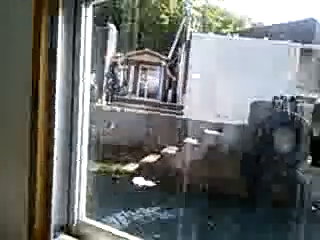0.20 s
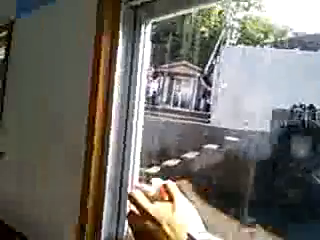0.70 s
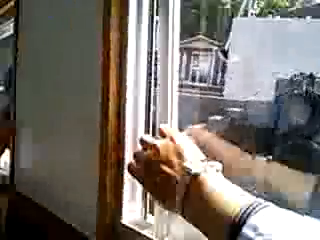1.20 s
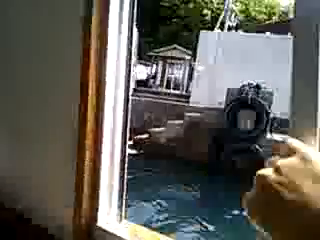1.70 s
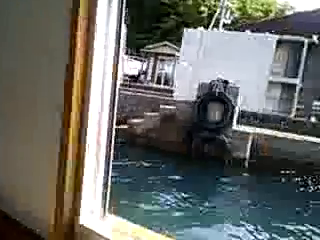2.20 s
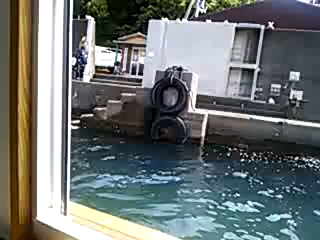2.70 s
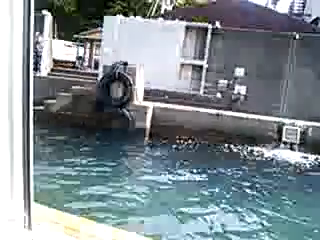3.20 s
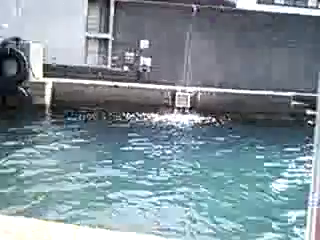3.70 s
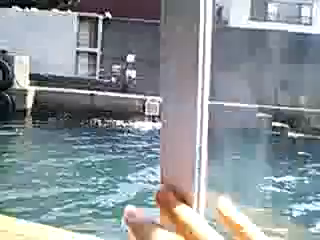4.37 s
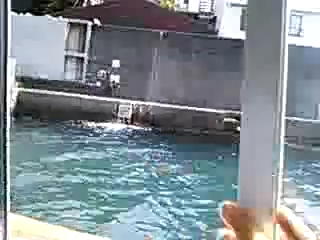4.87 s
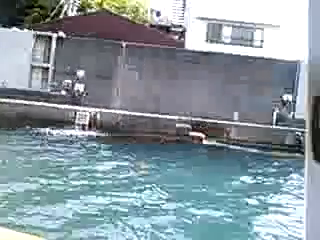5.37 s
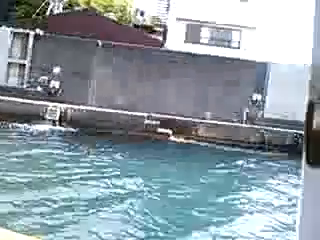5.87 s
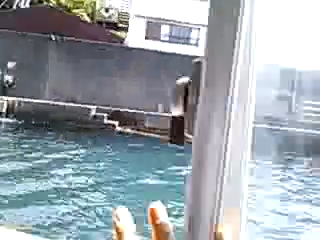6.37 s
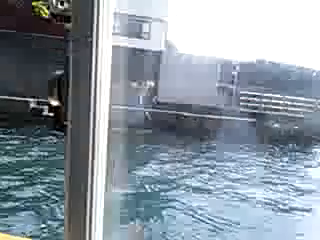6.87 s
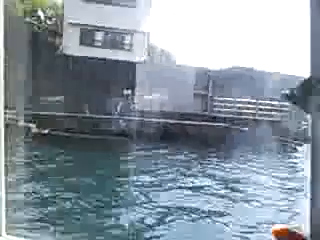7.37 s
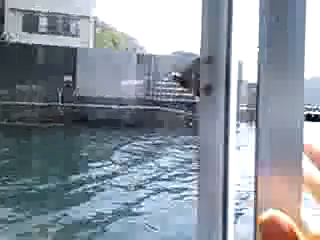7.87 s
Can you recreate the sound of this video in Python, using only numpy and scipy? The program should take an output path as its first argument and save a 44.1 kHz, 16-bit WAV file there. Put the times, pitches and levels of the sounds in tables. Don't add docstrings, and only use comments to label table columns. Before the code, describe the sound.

A slow diesel under the floor booms steadily through a boat cabin, with even clatter, faint gear whine and a soft hiss of air and water. Close to the microphone, a sliding window bumps and its glass rattles, then knocks on the frame a few times. Near the end it sticks and slips along its rail and thuds shut with a short metallic latch ring. The sound is dull and narrow, like a handheld phone.

```python
import sys
import numpy as np
from scipy import signal
from scipy.fft import rfft, irfft, next_fast_len
from scipy.io import wavfile
from scipy.ndimage import uniform_filter1d

SR = 44100
rng = np.random.default_rng(int(sys.argv[2]) if len(sys.argv) > 2 else 0)


def rack_gain(trim_db):
    fader = np.asarray(trim_db, float)
    return 10 ** (fader / 20)


def inscribe(sig):
    pcm = np.round(np.clip(np.atleast_2d(sig).T, -1, 1) * 32767)
    wavfile.write(sys.argv[1], SR, pcm.astype(np.int16))


N = 359415
T = np.arange(N) / SR
SIZE = next_fast_len(N)
CYLINDERS = 6

# start_s, firing_hz
FIRING_RATE = [(0, 54.75), (.8, 55.1), (1.8, 55.35), (2.4, 55.4), (3.3, 55.72), (4.3, 55.69), (5.3, 55.5),
               (6.3, 55.53), (6.8, 55.8), (8.15, 55.75)]
# start_s, firing_db, second_multiple_db
BOOM_PATH = [(0.0, -31, -32.5), (0.2, -37.5, -37.5), (0.6, -29.5, -33), (1.84, -29, -33.5),
             (2.25, -30, -27.5), (2.43, -29, -32.5), (3.08, -29, -33.5), (3.26, -25, -33.5),
             (3.55, -28, -35), (4.58, -26.5, -33), (5.2, -26, -38), (5.8, -30, -35.5), (5.95, -26.5, -36.5),
             (6.6, -32, -34), (6.9, -28.5, -35), (7.2, -33.5, -40), (7.58, -34, -32.5),
             (7.95, -26.5, -34.5)]
# start_s, level_db
THIRD_PATH = [(0.0, -39), (0.25, -37), (0.29, -41), (2.84, -44.5), (4.42, -37.5), (4.67, -45),
              (5.95, -44.5), (6.24, -54), (6.38, -42.5), (6.81, -43.5), (6.88, -56), (6.99, -43),
              (8.13, -39), (8.15, -44.5)]
SHAFT_MULTIPLES = [2, 3, 4, 7, 8, 9, 13, 16, 23, 24, 28, 30, 46, 48, 50, 54, 56, 58, 60, 63, 72, 84, 96,
                   137, 153]
SHAFT_DB = [-46, -49, -48, -54, -52, -47, -53, -44, -46, -52, -54, -54, -59, -53, -56, -59, -59, -60, -58,
            -61, -59, -61, -62, -60, -62]
# pitch_hz, width_hz, level_db
GEAR_WHINE = [(1028, 36, -56), (913, 39, -55), (1411, 25, -56.5)]
# pitch_hz, level_db
RUMBLE_COLOUR = [(12, -22), (22, -5), (43, -15), (64, -6), (200, -10), (260, -13.5), (320, -17), (369, -15),
                 (604, -21), (676, -20.5), (900, -30.5), (1170, -68), (1980, -120)]
CLATTER_COLOUR = [(300, -25.5), (600, -9), (680, -4), (760, -8.5), (900, -1.5), (960, -5.5), (1030, -2),
                  (1150, -2), (1320, -3), (1430, -6.5), (1800, -16.5), (2600, -36.5)]
HISS_COLOUR = [(1100, -30.5), (1500, -2), (1700, -2), (2200, -5), (2750, -4), (3150, -10.5), (5000, -12),
               (6700, -10), (6950, -16), (7900, -21), (8300, -25.5)]
# start_s, clatter_db
HATCH_PATH = [(0, -43), (2.0, -42), (2.56, -43.5), (3.05, -42.5), (3.9, -44), (5.1, -43.5), (7.0, -43),
              (7.7, -44), (8.15, -43)]
# place in cycle 0-1, level_db
PLATE_KNOCKS = [(.1, -3), (.2626, -5), (.4333, 0)]
LATE_HATCH_KNOCKS = [(.04, -5), (.79, 0)]
EARLY_HATCH_KNOCKS = [(.19, 0), (.32, -4), (.94, -5)]
BOARD_KNOCKS = [(.21, -1), (.71, 0)]
# multiple of the cycle, level_db, from_s, until_s
SINGING_PANELS = [(34, -50.5, 1.2, 9), (36, -49.5, .9, 5.6), (36, -51, 6.2, 9), (126, -52.5, 2.5, 4.4),
                  (74, -57, 2.4, 5.2), (23, -48, .7, 2.3), (18, -44, .8, 2.4), (18, -45, 3.5, 4.5),
                  (18, -45, 5.1, 7), (47, -51, -1, .7), (123, -55, -1, 2.4), (111, -54, 1.1, 2.3)]
# start_s, level_db, pitch_hz, t60_s
SASH_BUMPS = [(0.031, -22, 209, 0.17), (.19, -25.5, 169, 0.3), (1.497, -31.5, 663, 0.085),
              (3.285, -26.5, 201.3, 0.25), (3.287, -25, 450, 0.04), (1.23, -26.5, 209, 0.25),
              (7.261, -17, 111, 0.035), (7.265, -26, 300, 0.042), (7.274, -20, 450, 0.027),
              (7.291, -18, 197, 0.037), (7.317, -13.5, 120, 0.042), (7.329, -9.5, 112, 0.03),
              (7.335, -22, 317, 0.044), (7.3436, -19.5, 400, .012), (7.3458, -9, 400, 0.0094),
              (7.353, -11.5, 90, 0.058), (7.381, -12, 120, 0.014), (7.4157, -19, 130, 0.046),
              (7.4245, -20, 180, .04), (7.435, -15, 89, 0.036), (7.445, -19, 85, 0.033),
              (3.2965, -26.5, 520, 0.036), (3.307, -19, 150, .06)]
# start_s, level_db
PANE_RATTLES = [(0.134, -46.5), (0.26, -43.5), (0.272, -37.5), (0.289, -39), (0.44, -50), (0.553, -38),
                (0.569, -46), (0.766, -60), (1.0225, -42), (3.402, -50), (4.3765, -43.5), (4.753, -40.5),
                (4.8595, -54.5)]
# start_s, level_db, pitch_hz, t60_s
FELT_SCUFFS = [(1.49, -37, 800, 0.05), (1.492, -40, 5460, 0.087), (3.268, -42.5, 5000, 0.11),
               (3.285, -34, 703, .07), (2.606, -47, 5980, .04), (1.784, -45, 2410, 0.24),
               (1.799, -50, 6500, .05), (4.64, -49, 5100, 0.2), (6.565, -47, 3170, .11),
               (7.09, -45.5, 5070, 0.2), (7.261, -30, 450, 0.068), (7.286, -32, 407, 0.04),
               (7.309, -30.5, 302, 0.086), (7.329, -35.5, 540, 0.051), (7.344, -36.5, 690, 0.035),
               (7.405, -29, 496, 0.05), (7.406, -30.5, 2260, 0.039), (7.416, -44, 2900, 0.088),
               (.403, -52, 6360, .08), (0.609, -52.5, 6370, .1), (7.43, -50, 4100, 0.044),
               (7.432, -29.5, 246, 0.047), (8.104, -43.5, 4630, 0.07), (.22, -38.5, 260, .25),
               (.4, -39, 200, .2), (4.3, -40, 250, .28), (4.55, -37.5, 330, .28), (6.88, -36, 120, .2),
               (7.3, -32.5, 220, .28), (7.407, -37.5, 3000, .05)]
# start_s, level_db,
# pitch_hz, swell_s
RAIL_RINGS = [(1.497, -41.5, 4157, 0.007), (1.495, -36, 1430, 0.009), (1.53, -53, 4350, .013),
              (1.772, -50, 4800, .012), (1.79, -48, 4800, .011), (1.8, -50, 4600, .013),
              (1.813, -48, 4720, .011), (3.0, -56, 4100, .012), (3.277, -46, 6750, .004),
              (3.291, -29, 3220, 0.002), (3.298, -42, 3260, 0.0016), (2.608, -42, 3350, 0.0017),
              (2.609, -39, 1400, .002), (2.624, -43, 1900, .003), (1.497, -44, 5500, .006),
              (3.305, -37.5, 1156, .012), (6.481, -47.5, 4700, .002), (6.527, -42, 4530, .002),
              (6.536, -50, 5030, 0.0026), (6.5506, -40, 4870, 0.0023), (6.567, -38, 1720, .0036),
              (6.572, -43, 3200, 0.0016), (6.58, -43, 4300, .002), (6.587, -42, 3150, 0.0015),
              (6.595, -48, 2420, .0023), (6.971, -36, 5950, 0.0028), (6.995, -51, 5060, .0027),
              (7.107, -47, 6160, .002), (7.18, -50, 4970, .009), (7.243, -45, 6650, 0.0054),
              (7.304, -45, 6400, .004), (7.396, -47, 3700, 0.0026), (7.4061, -21.5, 1904, 0.004)]
# start_s, snap_db, snap_hz, body_db, noise_db
FRAME_KNOCKS = [
    (1.499, -53, 5600, -39.5, -43.5),
    (2.607, -38.5, 3080, -36.5, -48.5),
    (3.2905, -30.5, 5970, -33, -35.5),
    (6.5513, -46, 3300, -50, -44.5),
    (6.972, -48, 5030, -46, -45),
    (7.406, -33, 6030, -40.5, -32.5),
]
# pitch_hz, level_db, t60_s
LATCH_MODES = [(1560, -10, .03), (2250, -9, .02), (2900, -8, .02), (5087, 2.5, .016)]
# pitch_hz, level_db
FRAME_COLOUR = [(20, 0), (6800, 0), (7000, -2), (9000, -3)]


def level(x, db):
    return x * rack_gain(db) / np.sqrt(np.mean(x ** 2))


def gain_at(hz, points):
    f, db = np.transpose(points)
    return rack_gain(np.interp(np.log(hz + 1), np.log(f), db, left=-70, right=-70))


def colour(x, points):
    hz = np.arange(SIZE // 2 + 1) * SR / SIZE
    return irfft(rfft(x, SIZE) * gain_at(hz, points), SIZE)[:N]


def band(x, hz, width):
    return signal.lfilter(*signal.iirpeak(min(hz, .45 * SR), hz / width, fs=SR), x)


def walk(rate):
    k = int(SR / rate)
    steps = np.repeat(rng.standard_normal(N // k + 1), k)
    return 1.17 * uniform_filter1d(uniform_filter1d(steps, k), k)[:N]


def hold(times):
    return np.interp(T, times, [0, 1, 1, 0])


def follow(points):
    return np.interp(T, *np.transpose(points))


def flickering(points, flicker_db, rate):
    hz = np.arange(SIZE // 2 + 1) * SR / SIZE
    spectrum = rfft(rng.standard_normal(SIZE)) * gain_at(hz, points)
    lowest = np.floor(np.log2(points[0][0] + 15))
    out = 0
    for centre in np.arange(lowest, np.log2(points[-1][0]) + .5, .5):
        share = np.cos(np.pi * np.clip(np.log2(hz + 1) - centre, -.5, .5)) ** 2
        out = out + irfft(spectrum * share, SIZE)[:N] * rack_gain(flicker_db * walk(rate))
    return level(out, 0)


def repeating(cycle, points):
    size = 8192
    cycle_hz = follow(FIRING_RATE).mean() / CYLINDERS
    shape = gain_at(np.arange(size // 2 + 1) * cycle_hz, points)
    patterns = irfft(rfft(rng.standard_normal((3, size))) * shape, size)
    place = cycle % 1 * size
    out = 0
    for pattern in patterns:
        out = out + (1 + .6 * walk(.8)) * np.interp(place, np.arange(size), pattern, period=size)
    return level(out, 0)


def knocking(cycle, knocks, hz, width):
    pushes = 0
    for place, db in knocks:
        count = np.floor(cycle + 1 - place).astype(int)
        sizes = rack_gain(db + 1.2 * rng.standard_normal(count[-1] + 1))
        pushes = pushes + np.diff(count, prepend=count[0]) * sizes[count]
    return level(band(band(band(pushes, hz, width), hz, 2 * width), hz, 3 * width), 0)


def add(out, s, sound):
    i = int(s * SR)
    out[i:i + len(sound)] += sound[:N - i]


def decay(t60, rise_s):
    t = np.arange(int(.3 * SR)) / SR
    swell = np.sin(np.pi / 2 * np.minimum(t / rise_s, 1)) ** 2
    return t, swell * rack_gain(-60 * np.maximum(t - rise_s, 0) / t60)


def add_tone(out, s, db, hz, rise_s, t60):
    t, env = decay(t60, rise_s)
    add(out, s, rack_gain(db) * env * np.sin(2 * np.pi * hz * t))


def add_touch(out, s, db, hz, width, rise_s, t60):
    t, env = decay(t60, rise_s)
    push = rng.standard_normal(len(t))
    if rise_s < .0015:
        push[int(rise_s * SR)] += 16
    rung = band(band(band(push, hz, width), hz, 2 * width), hz, 2.1 * width)
    add(out, s, env * level(rung, db))


def engine_cycle():
    return np.cumsum(follow(FIRING_RATE)) / SR / CYLINDERS


def firing_boom(turn):
    s, *boom_db = np.transpose(BOOM_PATH)
    boom = 0
    for k, db in enumerate(boom_db):
        sway_db = (k + 1) * .87 * walk(11)
        throb_db = (.56 + 1.2 * k) * np.cos(2 * turn + 1)
        phase = (k + 1) * CYLINDERS * turn + 3.92 * (k + 1) + k * .73 * walk(1.8)
        boom = boom + rack_gain(np.interp(T, s, db) + sway_db + throb_db) * np.cos(phase)
    third_db = follow(THIRD_PATH) - 1.5 + 1.5 * walk(10)
    third = rack_gain(third_db) * np.cos(3 * CYLINDERS * turn + 1.3 * walk(2.5))
    return np.sqrt(2) * (boom + third)


def shaft_lines(turn):
    out = 0
    for k, db in zip(SHAFT_MULTIPLES, SHAFT_DB):
        phase = k * turn + 2 * np.pi * rng.random() + .35 * walk(2.2)
        out = out + rack_gain(db + 1.4 * walk(4)) * np.cos(phase)
    return np.sqrt(2) * out


def pane_buzz(turn):
    loose = hold((2.4, 4.2, 6.5, 6.95))
    buzz_db = -59 + 9 * loose + 1.5 * walk(2.2) - 3.5 + 2.5 * walk(16)
    return np.sqrt(2) * rack_gain(buzz_db) * np.cos(74 * turn + .5 * walk(2.5) + .5 * walk(14))


def hull_rumble(cycle):
    return level(flickering(RUMBLE_COLOUR, 1.2, 9), -37.5) + level(repeating(cycle, RUMBLE_COLOUR), -42)


def clatter_and_gears(cycle, turn):
    beat = rack_gain(.34 * np.cos(3 * turn) + .94 * np.cos(5 * turn + 2) + .33 * np.cos(turn))
    clatter = level(beat * flickering(CLATTER_COLOUR, 1.1, 8), -4.2)
    clatter += level(repeating(cycle, CLATTER_COLOUR), -4)
    gears = sum(level(band(rng.standard_normal(N), hz, width), db) for hz, width, db in GEAR_WHINE)
    return rack_gain(follow(HATCH_PATH)) * (clatter + gears * rack_gain(41.5))


def cycle_knocks(cycle):
    hatch_db = follow(HATCH_PATH)
    facing = hold((4.4, 5.0, 7.0, 7.4))
    plate_db = -55.5 + .5 * (hatch_db - hatch_db.mean()) + 7.5 * facing + .8 * walk(2.2)
    out = rack_gain(plate_db) * knocking(cycle, PLATE_KNOCKS, hz=1143, width=56)
    late, early = hold((2.2, 3.0, 7.3, 7.7)), hold((-.2, .1, 1.3, 2.0))
    out += rack_gain(-54) * late * knocking(cycle, LATE_HATCH_KNOCKS, hz=1020, width=60)
    out += rack_gain(-50.5) * early * knocking(cycle, EARLY_HATCH_KNOCKS, hz=1000, width=120)
    out += rack_gain(-47.5 + 1.2 * walk(2)) * knocking(cycle, BOARD_KNOCKS, hz=323, width=30)
    return out


def panels(turn):
    fade_s = .3
    out = 0
    for k, db, start, end in SINGING_PANELS:
        heard = hold((start - fade_s, start + fade_s, end - fade_s, end + fade_s))
        gain = rack_gain(db + 1.8 * walk(9) + 2.5 * np.cos(turn + k))
        phase = k * turn + 2 * np.pi * rng.random() + .4 * walk(4)
        out = out + np.sqrt(2) * heard * gain * np.cos(phase)
    return out


def diesel():
    cycle = engine_cycle()
    turn = 2 * np.pi * cycle
    tones = firing_boom(turn) + shaft_lines(turn) + pane_buzz(turn) + panels(turn)
    return tones + hull_rumble(cycle) + clatter_and_gears(cycle, turn) + cycle_knocks(cycle)


def air():
    closing = hold((6.2, 6.95, 7.35, 7.65))
    return flickering(HISS_COLOUR, .4, 20) * rack_gain(-48.5 + 2 * closing + .5 * walk(3))


def sash_bumps(out):
    for s, db, hz, t60 in SASH_BUMPS:
        add_tone(out, s, db, hz, .001, t60)


def pane_rattles(out):
    for s, db in PANE_RATTLES:
        t, env = decay(t60=.068, rise_s=.0034)
        bright = band(band(rng.standard_normal(len(t)), 7500, 1300), 7500, 1300)
        add(out, s - .003, env * level(bright, db - 5.5))


def felt_scuffs(out):
    for s, db, hz, t60 in FELT_SCUFFS:
        add_touch(out, s, db, hz, 370 + .39 * hz, .1 * t60, t60)


def rail_rings(out):
    for s, db, hz, rise_s in RAIL_RINGS:
        t60 = .025 + 1.4 * rise_s
        add_touch(out, s, db - 8, hz, 320 + .03 * hz, rise_s, t60)
        add_tone(out, s, db, hz, rise_s, t60)


def frame_knocks(out):
    noise_hz, noise_width, lead_s, tail_s = 4800, 6800, .012, .006
    for s, snap_db, hz, body_db, noise_db in FRAME_KNOCKS:
        add_touch(out, s - lead_s, noise_db, noise_hz, noise_width, lead_s, t60=.06)
        add_touch(out, s, snap_db, hz, .38 * hz, rise_s=.00086, t60=.024)
        add_touch(out, s, body_db, 1310, 1500, rise_s=.0037, t60=.16)
        add_touch(out, s + tail_s, noise_db - 1.5, noise_hz, noise_width, tail_s, t60=.14)


def latch(out):
    for hz, db, t60 in LATCH_MODES:
        add_tone(out, 7.4052, db - 24, hz, .003, t60)


def window():
    out, touches = np.zeros(N), np.zeros(N)
    sash_bumps(out)
    pane_rattles(out)
    felt_scuffs(touches)
    rail_rings(touches)
    frame_knocks(touches)
    latch(out)
    return out + colour(touches, FRAME_COLOUR)


def scene():
    return (diesel() + air() + window())[None]


def top_cut(x):
    return signal.sosfilt(signal.butter(12, 9010, fs=SR, output="sos"), x)


def record(dry):
    phone_rate_hz = 16000
    cut = signal.ellip(12, .3, 90, 7740, fs=SR, output="sos")
    running = signal.sosfilt_zi(cut) * dry[0, 0]
    kept = signal.sosfilt(cut, dry[0], zi=running)[0]
    flipped = kept * np.cos(2 * np.pi * phone_rate_hz * T)
    mirror = colour(flipped, [(8000, -3.0), (8300, -3.5), (8600, -11.0), (9100, -36.0)])
    return top_cut((kept + mirror)[None])


dry = scene()
out = record(dry)
inscribe(out)
```